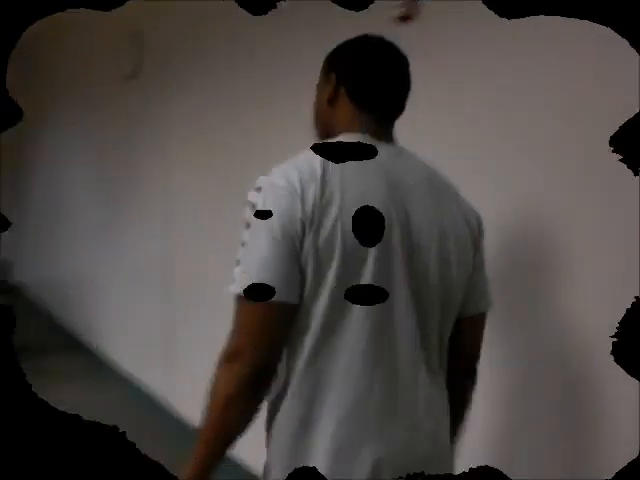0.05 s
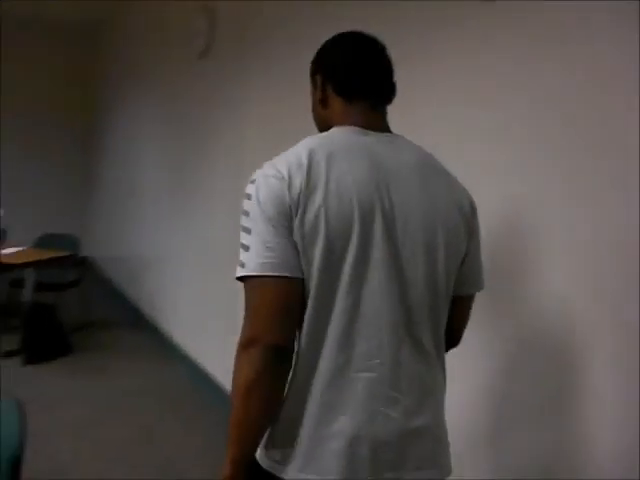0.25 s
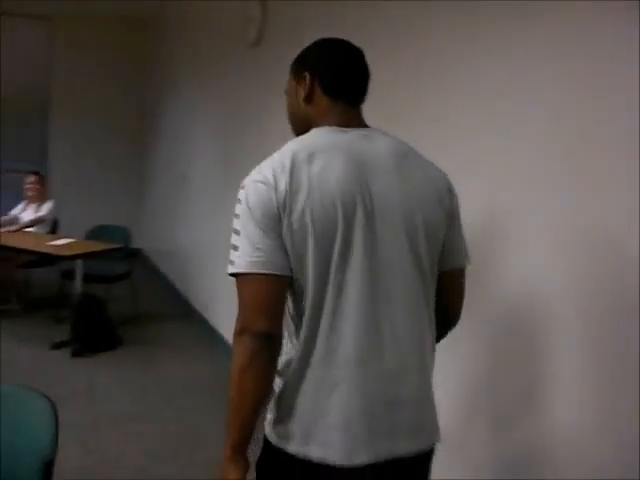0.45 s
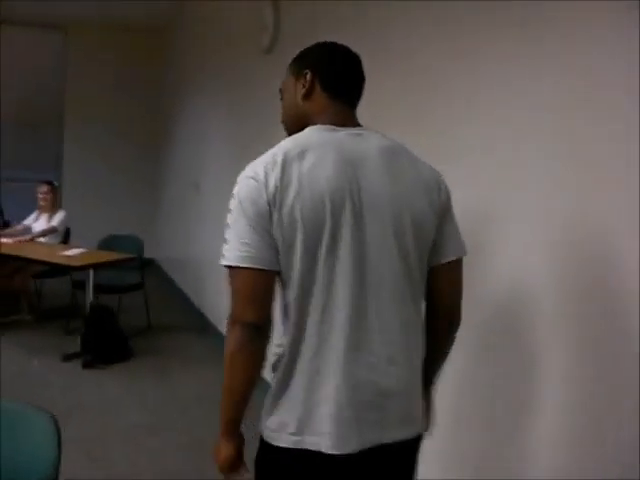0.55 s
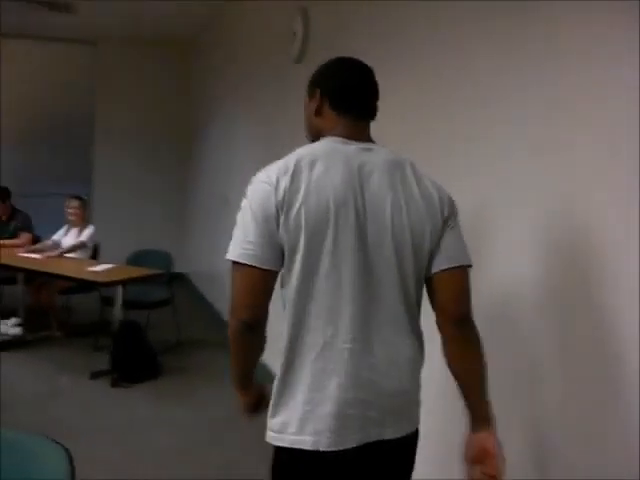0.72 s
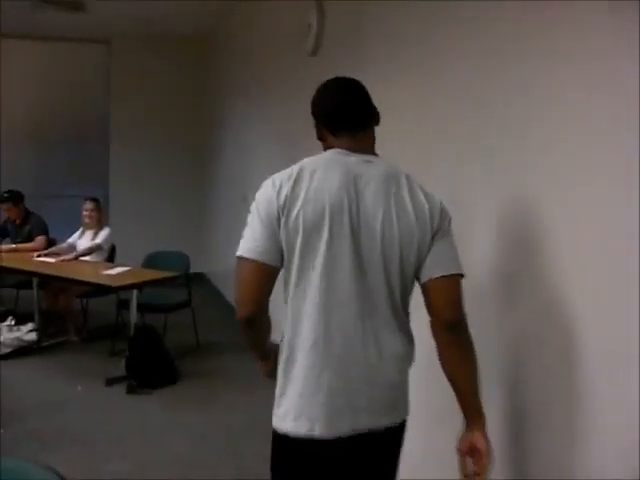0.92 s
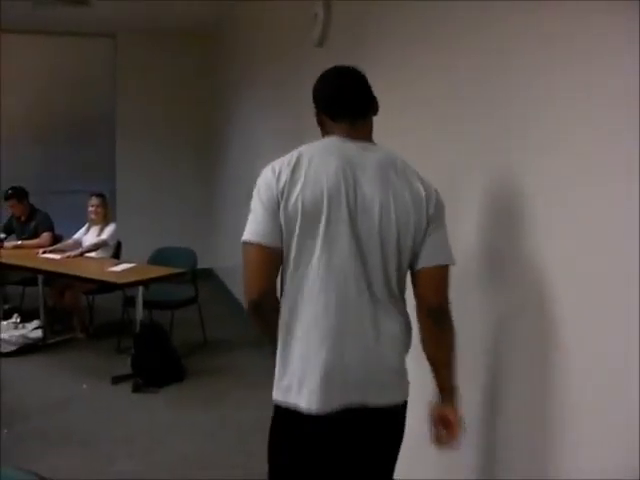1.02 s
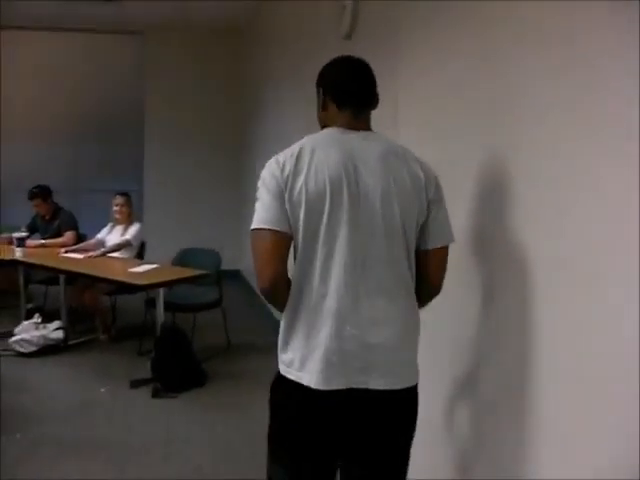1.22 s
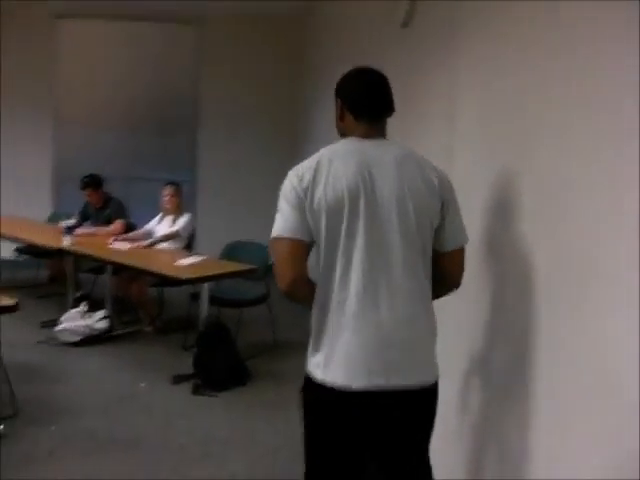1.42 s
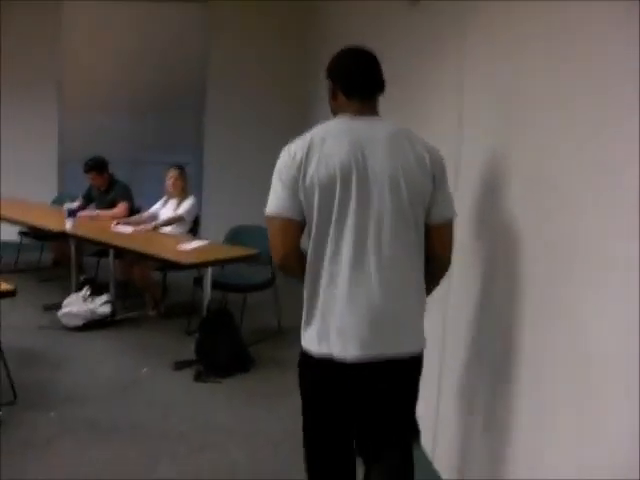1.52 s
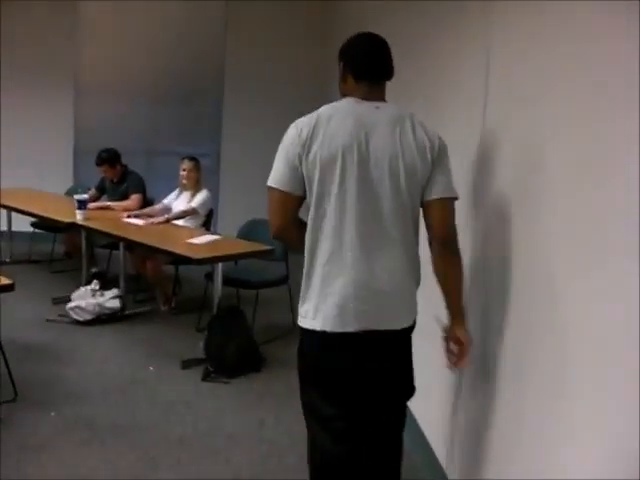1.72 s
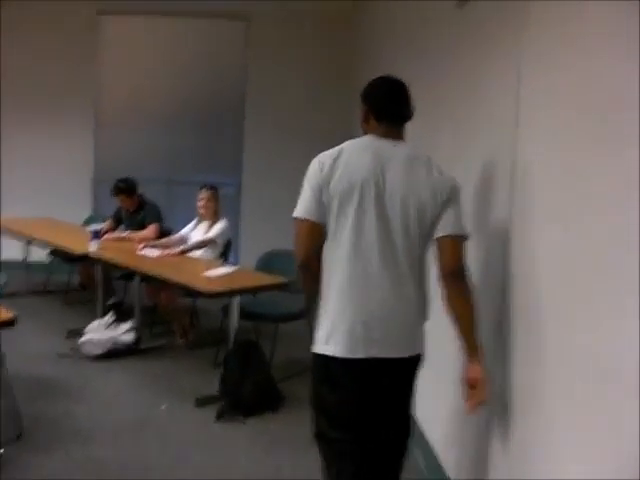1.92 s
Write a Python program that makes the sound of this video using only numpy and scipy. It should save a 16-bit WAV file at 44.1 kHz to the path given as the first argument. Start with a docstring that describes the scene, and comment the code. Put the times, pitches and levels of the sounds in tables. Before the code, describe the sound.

A heavy door shuts in a bare classroom. Its hardware knocks softly around 0.2 seconds, and the latch clacks sharply near 0.35. From 0.5 to 0.6 seconds the door thumps closed and the bolt snaps home with a metallic ping. The boom and echo fade by about 1.3 seconds. Low ventilation continues underneath, with faint steps near 0.9 and 1.5 seconds and a slight clothing rustle at the end.

```python
"""A bare classroom, where a heavy door shuts. Its hardware knocks softly, the latch clacks against the
strike plate, then the leaf meets the frame and the sprung bolt snaps home with a ping. The wood thumps
and booms, the latch metal shimmers on and the walls echo. Underneath are the low rush of ventilation
and the rustle and soft steps of someone walking."""
import sys
import numpy as np
from scipy import signal
from scipy.fft import rfft, irfft
from scipy.io import wavfile

SR = 44100
rng = np.random.default_rng(int(sys.argv[2]) if len(sys.argv) > 2 else 0)


def output_pcm(signal):
    """Save a mono or channel-first signal as 16-bit PCM at the path in sys.argv[1].

    Samples are clipped to [-1, 1] before scaling.
    """
    pcm = np.clip(np.atleast_2d(signal).T, -1, 1) * 32767
    wavfile.write(sys.argv[1], SR, np.round(pcm).astype(np.int16))


N = 85995


def gain(db):
    """Decibels to amplitude."""
    return 10 ** (np.asarray(db) / 20)


def curve_at(hz, points):
    """Read (Hz, value) points on a log-frequency axis."""
    freqs, values = np.array(points, float).T
    return np.interp(np.log(np.maximum(hz, 1)), np.log(freqs), values)


def unit_rms(x):
    """Scale to rms 1."""
    return x / np.sqrt(np.mean(x ** 2))


def shaped_noise(spectrum):
    """Noise of rms 1, coloured by (Hz, dB) points."""
    eq = gain(curve_at(np.fft.rfftfreq(N, 1 / SR), spectrum))
    return unit_rms(irfft(rfft(rng.standard_normal(N)) * eq, N))


def wander(rate_hz):
    """Random drift with a spread near 1."""
    t = np.arange(N) / SR
    return np.interp(t * rate_hz, np.arange(N), rng.standard_normal(N))


def half_octaves(x, lowest_hz=45, count=17):
    """Yield (centre Hz, band of rms 1) for each half octave."""
    position = 2 * np.log2(np.maximum(np.fft.rfftfreq(N, 1 / SR), 1) / lowest_hz)
    spectrum = rfft(x)
    for k in range(count):
        window = np.cos(np.pi / 2 * np.clip(position - k, -1, 1))
        yield lowest_hz * 2 ** (k / 2), unit_rms(irfft(spectrum * window, N))


def decay(t, t60):
    """Exponential fall of 60 dB in t60 seconds."""
    return np.exp(-np.log(1000) * t / t60)


def mix_in(out, start, x):
    """Add x to out from the given second on."""
    i = int(start * SR)
    out[i:i + len(x)] += x[:N - i]


# Tone of the air bed. Each row: frequency in Hz, relative level in dB.
VENT_SPECTRUM = [(18, -60), (30, -80), (53, -8), (108, -8), (138, 1), (165, -7), (286, -6), (309, -11),
                 (341, -10), (655, -17.5), (1360, -20), (4870, -26), (12000, -42.5), (15600, -55),
                 (22000, -120)]


def ventilation(level_db=-54.5):
    """Moving air makes a low, gently wavering rush with a little hiss."""
    return shaped_noise(VENT_SPECTRUM) * gain(level_db + 0.7 * wander(4.94))


# Tone of the dull rustle and the bright scuff. Each row: frequency in Hz, relative level in dB.
RUSTLE_SPECTRUM = [(24, -57), (40, -47), (86, -2.5), (245, -3), (319, -10), (415, -9), (956, -18),
                   (1080, -17), (2000, -18.5), (12000, -39.5), (15600, -74), (22000, -120)]
SCUFF_SPECTRUM = [(200, -16), (2000, -2), (3300, -6), (4100, 0), (5200, -3), (6300, -1), (9000, -11),
                  (12000, -17)]
# Fader ride on the rustle. Each row: time in seconds, level in dB.
RUSTLE_FADER = [(0, -45), (.32, -44), (1.1, -72), (1.74, -67.5), (1.79, -57.5), (1.95, -56)]


def walker(scuff_start_s=1.922, scuff_rise_s=0.008, scuff_db=-55):
    """Clothes rustle, fall quiet and stir again; a scuff comes in at the very end."""
    t = np.arange(N) / SR
    fader_db = np.interp(t, *np.array(RUSTLE_FADER).T)
    rustle = shaped_noise(RUSTLE_SPECTRUM) * gain(fader_db + wander(60.8))  # about 1 dB of flicker
    scuff_attack = np.clip((t - scuff_start_s) / scuff_rise_s, 0, 1)
    return rustle + shaped_noise(SCUFF_SPECTRUM) * gain(scuff_db) * scuff_attack


# The six frequencies in Hz, low to high, at which each hit's colour is set.
COLOUR_HZ = [80, 300, 950, 3200, 6000, 10500]


def colour_gain(hz, colour_db):
    """How strongly a hit of this colour drives the given frequency."""
    return gain(curve_at(hz, list(zip(COLOUR_HZ, colour_db))))


# EQ shared by all knocks and clacks, on top of their colour. Each row: frequency in Hz, gain in dB.
IMPACT_EQ = [(40, -31), (80, -2), (160, -1.5), (320, -0.5), (650, -9), (1100, -1), (1800, -6.5),
             (3000, -3.5), (4500, -7.5), (6000, -4), (8000, -7), (12000, -7)]
# Reverb of the bare walls. Each row: frequency in Hz, send level in dB, t60 in seconds.
ROOM_REVERB = [(82, -11.5, 1.4), (317, -12.5, 0.79), (980, -11.5, 0.71), (3130, -15, 0.84),
               (5900, -18, 1.044), (10900, -15, 0.49)]


def impacts_in_room(hits, grain=0.17, rise_cycles=0.54, bass_linger_s=0.013, room_build_s=0.0089):
    """Each contact chatters briefly, dies away lows last, and sets off the room's smooth echo."""
    t, room, out = np.arange(N) / SR, np.array(ROOM_REVERB), np.zeros(N)
    early = t[:N // 10]
    grainy = rng.standard_normal(N) * np.exp(grain * wander(2500))
    smooth = rng.standard_normal(N)
    for (hz, crack), (_, echo) in zip(half_octaves(grainy), half_octaves(smooth)):
        attack = 1 - np.exp(-early * hz / rise_cycles)
        linger_s = bass_linger_s * COLOUR_HZ[0] / hz
        send = gain(curve_at(hz, room[:, [0, 1]]))
        room_t60 = curve_at(hz, room[:, [0, 2]])
        tail = send * (1 - np.exp(-t / room_build_s)) * decay(t, room_t60)
        crack_power, echo_power = np.zeros(N), np.zeros(N)
        for start, hold_s, t60, *colour_db in hits:
            level = colour_gain(hz, colour_db) * gain(curve_at(hz, IMPACT_EQ))
            release = decay(np.maximum(early - hold_s, 0), t60 + linger_s)
            mix_in(crack_power, start, (level * attack * release) ** 2)
            mix_in(echo_power, start, (level * tail) ** 2)
        out += crack * np.sqrt(crack_power) + echo * np.sqrt(echo_power)
    return out


# Soft, dull hits. Each row: start, scrape length and base t60 in seconds, then six colour levels in dB.
KNOCKS_AND_STEPS = [ (.180, 0.0024, 0.15, -42, -40, -44, -72, -68, -78),
                    (.197, 0.016, 0.17, -43, -44, -47, -74, -68, -64),
                    (.218, 0.022, 0.11, -48, -42.5, -41, -58, -50.5, -62),
                    (.239, 0.015, 0.13, -45.5, -39, -43, -66, -51, -63),
                    (.910, 0.0072, 0.051, -47, -48.5, -91, -78, -59, -82),
                    (1.548, .003, 0.018, -58, -62, -58, -61, -78, -84), ]


def knocks_and_steps():
    """The door hardware knocks before the latch catches; soft steps land later."""
    return impacts_in_room(KNOCKS_AND_STEPS)


# Hard, bright hits. Each row: start, chatter length and base t60 in seconds, then six colour levels in dB.
CLACKS = [ (0.2143, 0.00095, 0.023, -67, -58, -58, -39.5, -42.5, -42.5),
          (0.3367, 0.0054, 0.03, -50, -41.5, -45, -23.5, -36.5, -52),
          (.3440, 0.0036, 0.084, -63, -43, -30.5, -36, -33, -52),
          (0.3577, 0.0029, 0.026, -38.5, -32.5, -30.5, -22.5, -24, -24.5),
          (0.364, 0.00066, 0.019, -65, -24, -18.5, -32, -19, -38),
          (0.369, .008, 0.038, -48, -41.5, -30, -28.5, -31, -34.5),
          (0.4009, .010, 0.085, -60, -52, -31.5, -33.5, -29.5, -39.5),
          (0.4795, 0.018, 0.037, -52, -47, -48, -36, -50, -47),
          (0.4961, 0.0079, 0.067, -34.5, -33, -38.5, -32.5, -40, -39.5),
          (.5130, 0.0092, 0.12, -32, -35.5, -32, -27, -30, -40),
          (.5488, 0.0088, 0.026, -33.5, -32, -37, -21.5, -29.5, -31.5),
          (.5610, 0.0084, 0.058, -36, -24.5, -25.5, -41.5, -26, -40), ]


def latch_clacks():
    """The latch rattles against the strike plate, then the leaf meets the frame."""
    return impacts_in_room(CLACKS)


# The bolt's ping. Each row: pitch in Hz, relative level in dB, t60 in seconds.
BOLT_MODES = [(2813, -9.5, 0.079), (3020, 2, 0.029), (3930, -7, 0.039), (5640, -1, 0.027),
              (5700, -19.5, 0.12)]
# The latch's shimmer. Each row: centre in Hz, relative level in dB, t60 in seconds, spread in Hz.
LATCH_CLUSTERS = [(3794, -24.5, 1.2, 600), (7200, -37, 1.2, 130), (8730, -38, 1.03, 420)]
# The bolt is pushed in and let go. Each row: start in seconds, gain in dB.
BOLT_SNAPS = [(0.4971, -21), (0.5006, -20), (0.549, -21.5)]


def bolt_pings():
    """The sprung steel bolt pings brightly and leaves close partials beating in the latch metal."""
    t, out = np.arange(N) / SR, np.zeros(N)
    ping = sum(gain(db) * np.sin(2 * np.pi * hz * t) * decay(t, t60) for hz, db, t60 in BOLT_MODES)
    for hz, db, t60, spread_hz in LATCH_CLUSTERS:
        beating = wander(spread_hz) + 1j * wander(spread_hz)
        shimmer = np.real(beating * np.exp(2j * np.pi * hz * t))
        ping += gain(db) * shimmer * decay(t, t60)
    for start, db in BOLT_SNAPS:
        mix_in(out, start, gain(db) * ping)
    return out


# The door's body. Each row: pitch in Hz, level in dB relative to the clack's colour, t60 in seconds.
LEAF_MODES = [(81.5, -5, 1.25), (108.3, -15, 0.56), (156, -19, 1.2), (177.8, -9.5, 1.14), (325.1, -8, 0.4),
              (380.6, -8, .45), (543, -4, .25), (758, -11.5, 0.25), (871, -17, 0.35), (953, -12.5, 0.15),
              (1046, -8, .28), (1150, -15, 0.3), (1323, -19, 0.75), (1670, -15, 0.19)]


def leaf_boom():
    """Every clack rings the leaf's modes, each as strongly as the clack's colour reaches its pitch."""
    t, out = np.arange(N) / SR, np.zeros(N)
    for hz, db, t60 in LEAF_MODES:
        ring = gain(db) * np.sin(2 * np.pi * hz * t) * decay(t, t60)
        for start, _, _, *colour_db in CLACKS:
            mix_in(out, start, colour_gain(hz, colour_db) * ring)
    return out


# The door's weight. Each row: start in seconds, pitch in Hz, gain in dB, attack and t60 in seconds.
WOOD_THUMPS = [(0.033, 250, -27, 0.004, 0.13), (0.28, 150, -39, 0.0049, .14),
               (.495, 92, -14.5, 0.006, 0.098), (.5615, 360, -7, 0.004, 0.056),
               (.560, 170, -18, 0.0089, 0.076)]


def wood_thumps(octave_db=-11):
    """Heavy wood gives a few damped low cycles at each push, with a softer octave above."""
    t, out = np.arange(N // 4) / SR, np.zeros(N)
    for start, hz, db, attack_s, t60 in WOOD_THUMPS:
        tone = np.sin(2 * np.pi * hz * t) + gain(octave_db) * np.sin(4 * np.pi * hz * t)
        attack = 1 - np.exp(-(t / attack_s) ** 2)
        mix_in(out, start, gain(db) * tone * attack * decay(t, t60))
    return out


def scene():
    """A mono mix: the door up front, over knocks, walker and air."""
    door = latch_clacks() + leaf_boom() + bolt_pings() + wood_thumps()
    return (door + knocks_and_steps() + walker() + ventilation())[None]


def record(dry):
    """A steep low-pass takes off the very top."""
    cutoff_hz = 12050
    return signal.sosfilt(signal.ellip(10, 0.2, 70, cutoff_hz, fs=SR, output="sos"), dry)


dry = scene()
out = record(dry)
output_pcm(out)
```